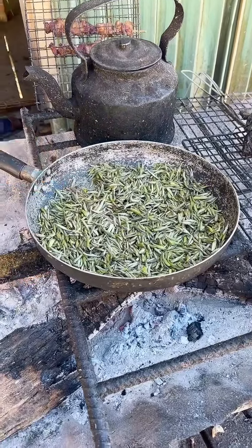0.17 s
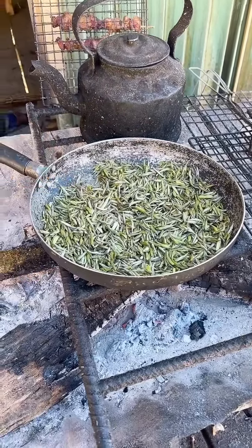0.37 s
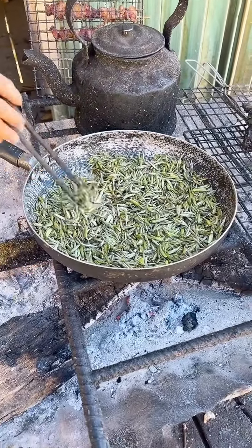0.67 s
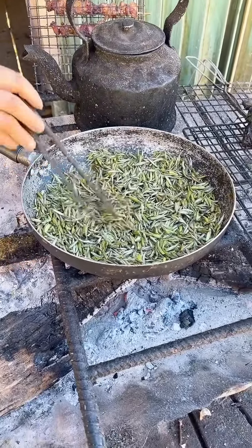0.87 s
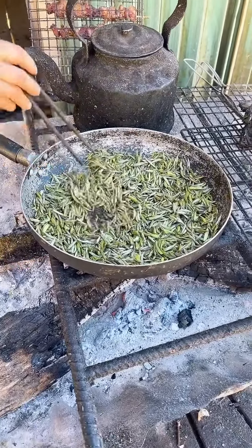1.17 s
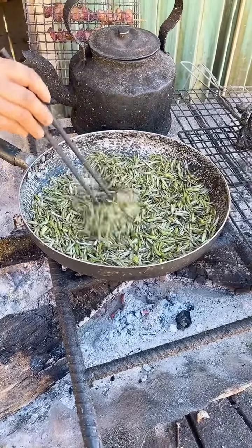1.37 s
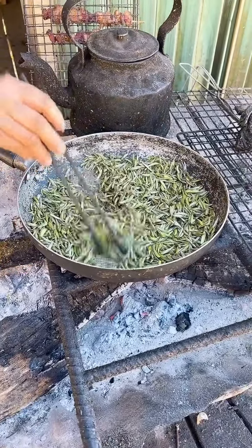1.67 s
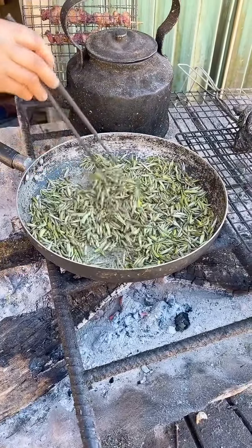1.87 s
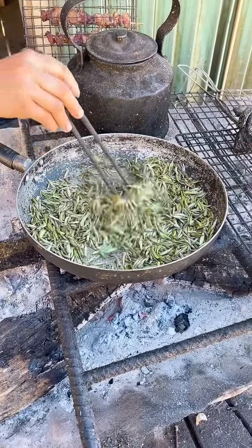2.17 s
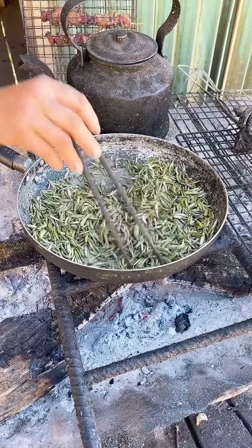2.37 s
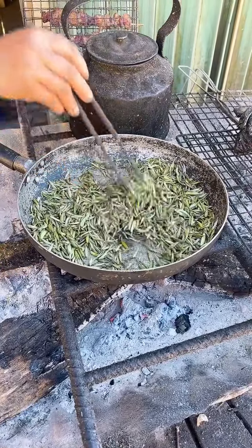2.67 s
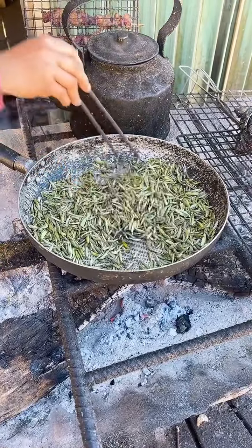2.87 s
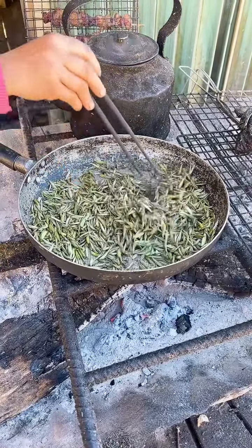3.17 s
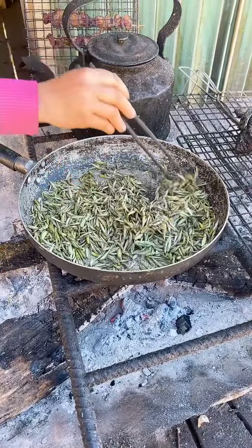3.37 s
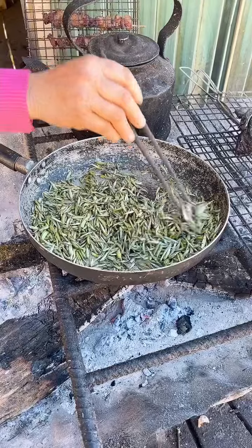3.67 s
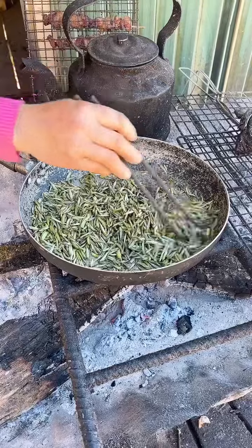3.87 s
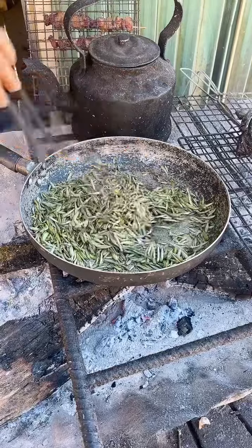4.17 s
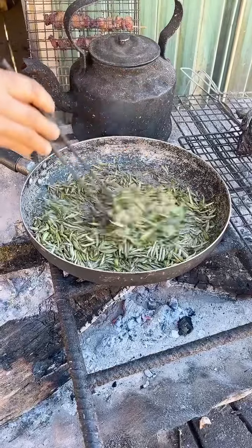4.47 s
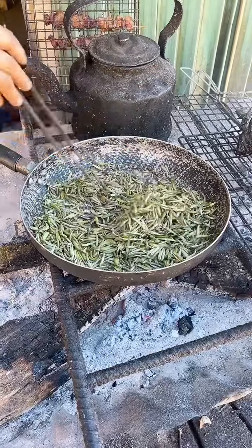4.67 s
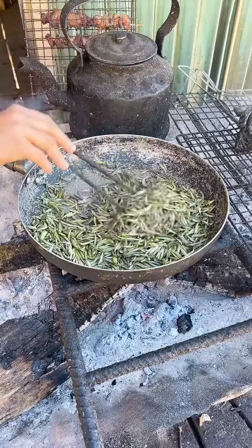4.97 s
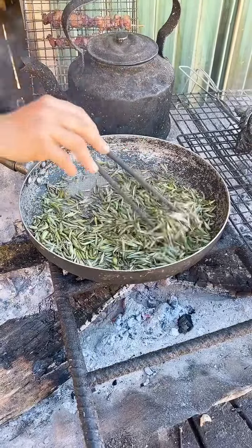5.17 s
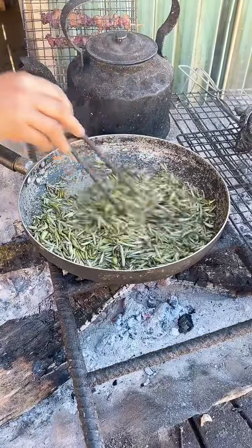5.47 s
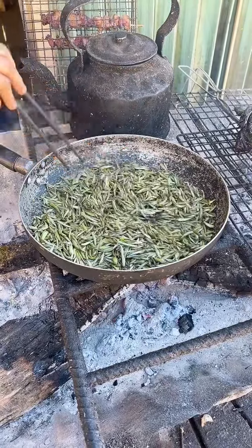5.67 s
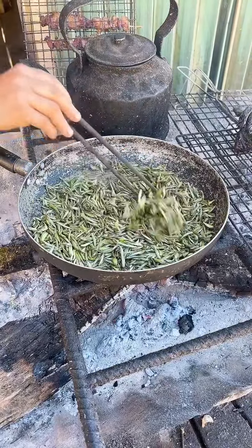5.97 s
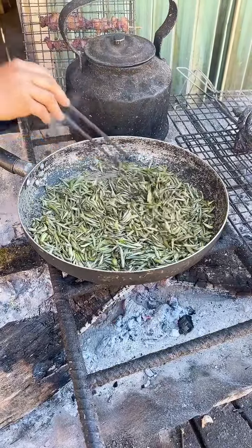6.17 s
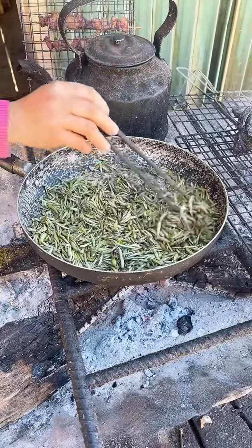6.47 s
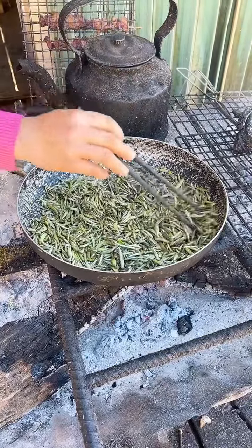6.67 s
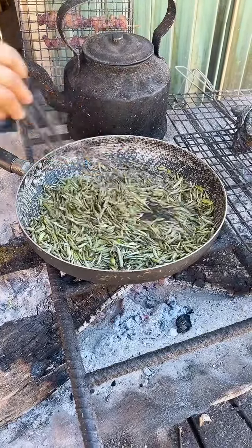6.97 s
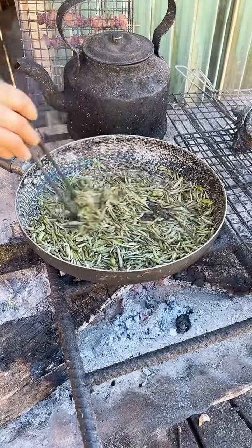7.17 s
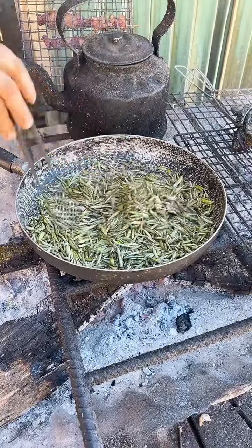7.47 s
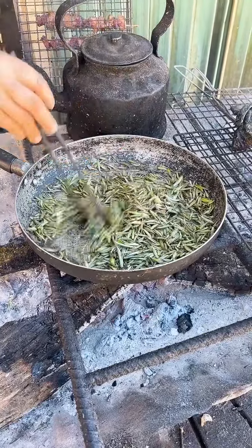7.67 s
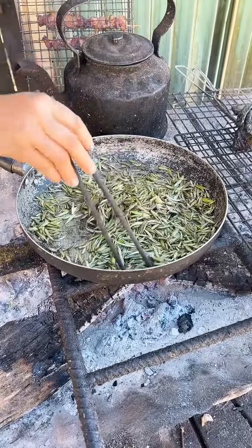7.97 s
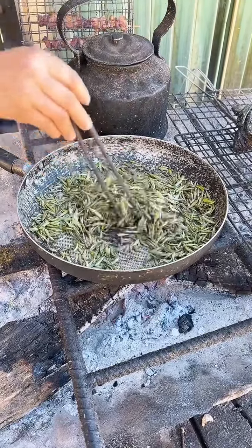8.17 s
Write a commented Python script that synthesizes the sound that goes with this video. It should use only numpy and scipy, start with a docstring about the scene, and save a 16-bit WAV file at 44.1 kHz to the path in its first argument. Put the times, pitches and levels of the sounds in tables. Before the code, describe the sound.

Long metal sticks stir dry tea leaves in a steel pan, close to a phone outdoors. After a nearly quiet start with small leaf ticks, soft rustling strokes begin and soon come about twice a second. Tips strike the pan with short, damped clinks and rasp briefly over the steel; the hardest knocks and scrapes come around five to six seconds. Low airy rumble and faint hiss continue underneath.

```python
"""You hear metal knocks and gritty scrapes, rustling and ticking leaves, and a low rumble with faint hiss.
Long metal sticks stir dry tea leaves in a steel pan over embers, outdoors, close to a phone.
Scrapes and knocks are noise sent through the resonances of the pan, which the leaves damp.
Rustle is shaped noise that swells with each sweep, ticks are very short noise bursts,
and the outdoor air is steady noise with a slowly swelling bass."""
import sys
import numpy as np
from scipy import signal
from scipy.fft import rfft, irfft, next_fast_len
from scipy.io import wavfile

SR = 44100
rng = np.random.default_rng(int(sys.argv[2]) if len(sys.argv) > 2 else 0)


def wav_record(signal):
    """Record a signal, one row per channel, as 16-bit PCM in the file named by sys.argv[1]."""
    frames = np.transpose(np.atleast_2d(signal))
    bounded = np.clip(frames, -1, 1)
    # unit amplitude maps onto the largest positive 16-bit level
    quanta = np.round(bounded * 32767).astype(np.int16)
    wavfile.write(sys.argv[1], SR, quanta)


N = 367308  # length [samples]

# the pan's modes (its own tones), damped by the leaves; some sources rescale widths or strengths:
# (frequency [Hz], width [Hz], strength [dB])
PAN_MODES = [(185, 34, -2), (338, 23, -10), (372, 63, -1.5), (436, 16, -2.5), (625, 15.6, 3.5),
             (673, 39, -2), (743, 20.3, 5.5), (790.3, 32.5, 1.5), (831, 30, -4), (874, 31, -16),
             (1297, 29, -9.5), (1422, 51, -8), (1513, 39, -4), (1635, 23, -14), (1740, 15, -24),
             (2401, 18, 1), (2829, 43, 8.5), (3120, 34, -2), (3330, 52, 1.5), (3647, 25, 9.5),
             (3710, 29, -4), (4010, 71, -2), (4454, 44, -10), (4780, 46, -11), (5140, 58, -10.5),
             (5580, 27, 1), (5990, 70, -9), (6300, 59, -6), (6930, 70, -5), (7100, 56, -28),
             (7690, 86, -5.5), (8507, 92, -2.5), (9180, 210, -15), (9740, 110, -26)]


def scrape(drag_db, tip_db, rock_db, tone_hz):
    """Tips stick and slip in tiny clicks that ring the pan; their place decides which modes they reach."""
    # how the rasp between the modes is coloured: (frequency [Hz], level per Hz [dB])
    rasp_tone = [(300, -27.5), (800, 15), (1150, 14), (1600, 21), (3000, 20.5), (5000, 12), (9800, -49),
                 (10800, -40), (16000, -17)]
    reach_octaves, far_db = 0.18, -12  # how near a mode must be to ring well; how weak a far one gets
    patchy_db, judder_db = 3.5, 3.0  # random unevenness of each mode, and of the clicks in time
    deep = [m for m in PAN_MODES if 0 < m[0] <= 500]
    low = [m for m in PAN_MODES if 500 < m[0] <= 2000]
    high = [m for m in PAN_MODES if 2000 < m[0] <= SR]
    slip = grit(4000, 1.06) * undb(judder_db * walk(70))

    # each spot favours one low tone; modes from 1100 Hz up to 2000 Hz always answer
    near = []
    for hz, _, _ in low:
        distance = np.log2(hz / tone_hz) / reach_octaves
        near.append(undb(far_db * np.minimum(distance ** 2, 1) * (hz < 1100)))
    # make up for the weakened modes, so that every spot drags equally loud
    reached = sum(g ** 2 * undb(db) ** 2 * width for g, (_, width, db) in zip(near, low))
    share = reached / sum(undb(db) ** 2 * width for _, width, db in low)
    drag_gains = [g * undb(patchy_db * walk(20)) for g in near]
    drag = ring(slip * undb(drag_db) / np.sqrt(share), low, drag_gains)

    rock = ring(slip * undb(rock_db), deep, [undb(patchy_db * walk(15)) for _ in deep])
    scratch = grit(5000, 1.6) * undb(judder_db * walk(70) + tip_db)
    tips = ring(scratch, high, [undb(patchy_db * walk(20)) for _ in high])
    # countless small modes merge into a broad rasp
    rasp = unit(colour(grit(6000, 0.5), rasp_tone)) * undb(tip_db + judder_db * walk(60))
    return undb(-4.5) * drag + undb(-1.5) * rock + undb(-5.5) * tips + undb(-5.5) * rasp


def pressing(rustle_db):
    """Pressing harder onto the steel scrapes louder; sweeping tips also brush it lightly."""
    # tips pressed onto the steel, levels before the mix in scrape:
    # (start [s], hardest [s], end [s], drag level [dB], tip scratch above drag [dB],
    #  rocking on the grate above drag [dB], low tone that this place favours [Hz])
    digs = np.array([(0.994, 1.002, 1.022, -44, 1, -22, 830), (1.279, 1.286, 1.312, -31.5, 1, -12, 830),
                     (2.074, 2.097, 2.135, -28, -5.5, -14.5, 770),
                     (2.456, 2.478, 2.53, -43.5, -15, -4, 775),
                     (2.535, 2.572, 2.595, -33.5, -3.5, -15, 800), (2.888, 2.91, 2.97, -34, -15, -8, 650),
                     (3.01, 3.02, 3.04, -39, -8, -8, 765), (3.32, 3.345, 3.375, -31, -10, -8, 650),
                     (3.375, 3.395, 3.43, -35, -12, -1, 600), (3.465, 3.497, 3.515, -30, -7.5, -7.5, 770),
                     (3.537, 3.542, 3.58, -41, -10, -10, 770), (4.292, 4.31, 4.325, -41, -2, -8, 800),
                     (4.335, 4.353, 4.365, -29, -6, -9, 855), (4.845, 4.885, 4.96, -18.5, -5, -24, 763),
                     (5.74, 5.75, 5.785, -29, 3, -16, 700), (5.79, 5.841, 5.885, -24, -4, -24, 750),
                     (6.262, 6.305, 6.357, -20, -3, -33, 760), (6.795, 6.826, 6.848, -26, -8.5, -21.5, 750),
                     (7.59, 7.6, 7.625, -46, -8, -10, 760), (7.66, 7.678, 7.695, -39, -3.5, -9, 765),
                     (7.993, 8.03, 8.07, -42.5, -2.5, -4.5, 810), (8.07, 8.093, 8.112, -29, -2, -13, 870)])
    # shape of one dig: (sag at its ends [dB], bulge exponent, rise [s], stop [s],
    #  after-sound [dB], after-sound [s])
    dig_shape = (-8, 2.2, .002, .008, -17, .04)
    # at a sweep of -45 dB the brush has these levels; each dB of rustle adds 1.48 dB
    brush_at_db, brush_slope = -45, 1.48
    brush_drag_db, brush_tip_db = -47, -44.5

    def pressed(above_db):
        """Power over time of all digs, raised by a number of dB."""
        return swells(np.c_[digs[:, :3], digs[:, 3] + above_db], *dig_shape)

    brush = undb(brush_slope * (rustle_db - brush_at_db)) ** 2
    drag_db = 10 * np.log10(pressed(0) + brush * undb(brush_drag_db) ** 2)
    tip_db = 10 * np.log10(pressed(digs[:, 4]) + brush * undb(brush_tip_db) ** 2)
    rock_db = 10 * np.log10(pressed(digs[:, 5]))
    tone_hz = np.interp(np.arange(N) / SR, digs[:, 1], digs[:, 6])
    return drag_db, tip_db, rock_db, tone_hz


def knocks():
    """Each landing chatters for a few ms: a crack, the pan's modes in a new mix, a short rattle."""
    # tips landing on the bottom: (time [s], level [dB], low thud above that level [dB],
    #  chatter [s], bright tone [Hz], thud tone [Hz])
    landings = [(0.9966, -46.5, 11.5, 0.005, 3400, 960), (1.2797, -29.5, 7.5, 0.003, 2820, 845),
                (2.0385, -14, -9.5, 0.0047, 8000, 750), (2.3748, -30, -25, 0.004, 3680, 358),
                (2.5331, -28, -5, 0.0041, 3660, 716), (2.5646, -25.5, 5, 0.0069, 3660, 790),
                (2.8856, -13, -10.5, 0.0034, 7100, 708), (3.3148, -16.5, -3.5, 0.0083, 3800, 1530),
                (3.4373, -19.5, -4, 0.0023, 2830, 370), (3.4705, -27.5, 3, 0.013, 2900, 729),
                (3.538, -44, -6, 0.0064, 2840, 751), (4.29, -27, -11, 0.003, 2820, 1500),
                (4.3498, -29, -10, 0.002, 2790, 872), (4.3919, -27, 3, 0.0025, 2830, 789),
                (4.8055, -11, -4.5, 0.0042, 5640, 694), (4.8453, -16.5, 4, 0.0021, 3440, 1510),
                (4.8587, -16.5, -12, 0.0046, 2720, 770), (5.7369, -6.5, -9, 0.007, 2900, 595),
                (6.1869, -11, -11.5, 0.0043, 6960, 730), (6.2662, -19.5, -5, 0.0057, 3680, 750),
                (6.2934, -19, -6, 0.0045, 6230, 800), (6.798, -30, -2, 0.0066, 2820, 751),
                (7.9932, -40, 10.5, 0.0026, 3680, 390), (8.0434, -34, -6, 0.005, 2780, 773),
                (8.09, -20, -5, 0.005, 3360, 1530)]
    scatter_db, near_db, spot_db = 3.0, -5, 9  # random mix; change per octave away; boost under the tip
    crack_db, ring_db, tail_db, tail_s = -0.5, -0.5, -20, 0.032
    out = np.zeros(N + SR)
    t = np.arange(int(.3 * SR)) / SR
    low = [m for m in PAN_MODES if m[0] <= 2000]
    # above 2000 Hz the modes differ less in strength
    high = [(hz, width, 0.37 * db) for hz, width, db in PAN_MODES if hz > 2000]
    mode_hz = np.array(PAN_MODES)[:, 0]
    rise = np.minimum(t / 0.00068, 1)
    for s, db, thud_db, chatter_s, bright_hz, thud_hz in landings:
        # modes weaken with their distance in octaves from the tones that this spot favours
        favoured = np.where(mode_hz <= 2000, thud_hz, bright_hz)
        octaves_off = abs(np.log2(mode_hz / favoured))
        # the mode right under the tip rings out clearly
        under_tip = spot_db * np.exp(-(octaves_off / 0.055) ** 2)
        mix = undb(scatter_db * rng.standard_normal(len(PAN_MODES)) + near_db * octaves_off + under_tip)
        noise = rng.standard_normal((2, len(t)))
        push = noise[0] * rise * np.exp(-(t / chatter_s) ** 1.07)
        thud = ring(push, low, mix)
        clink = ring(push, high, mix[len(low):])
        crack = band(band(push, bright_hz, 5.7), bright_hz, 5.7)
        rattle = band(noise[1], bright_hz, 1.0) * rise * np.exp(-t / tail_s)
        bright = undb(crack_db) * crack / abs(crack).max()
        bright += undb(ring_db) * clink / abs(clink).max()
        bright += undb(tail_db) * rattle
        i = int(s * SR)
        out[i:i + len(t)] += undb(db) * (bright + undb(thud_db) * thud / abs(thud).max())
    # a landing puts little above the pan's highest strong modes
    return signal.sosfilt(signal.cheby2(2, 14, 11500, fs=SR, output="sos"), out[:N])


def sweeps():
    """Rustle level over time [dB]: each sweep through the leaves swells, stops and dies away."""
    # each sweep: (start [s], fullest [s], end [s], level [dB])
    sweep_rows = [(0.695, 0.744, 0.83, -53.5), (0.963, 1.02, 1.125, -50.5), (1.262, 1.31, 1.477, -47.5),
                  (1.668, 1.744, 1.86, -46), (2.048, 2.15, 2.275, -45.5), (2.36, 2.397, 2.4, -54),
                  (2.535, 2.61, 2.73, -46), (2.896, 3.057, 3.157, -45.5), (3.33, 3.457, 3.62, -46.5),
                  (3.773, 3.795, 3.83, -56.5), (3.892, 3.986, 4.15, -43.5), (4.287, 4.365, 4.48, -52),
                  (4.42, 4.504, 4.574, -42.5), (4.69, 4.75, 4.8, -58), (4.808, 4.875, 5.05, -43),
                  (5.357, 5.484, 5.62, -43.5), (5.742, 5.84, 6.01, -46.5), (6.263, 6.31, 6.4, -42.5),
                  (6.735, 6.86, 6.955, -45), (7.13, 7.28, 7.385, -48), (7.443, 7.483, 7.55, -52.5),
                  (7.635, 7.69, 7.765, -44), (8, 8.095, 8.25, -44.5)]
    # shape of one sweep: (sag at its ends [dB], bulge exponent, rise [s], stop [s],
    #  after-sound [dB], after-sound [s])
    sweep_shape = (-9.5, 1.67, 0.02, .013, -22, .16)
    return 10 * np.log10(swells(sweep_rows, *sweep_shape))


def leaves(rustle_db):
    """Dry leaves rub on each other and on the steel in noise and clicks; single ones snap or drop."""
    # colour of the rustle: (frequency [Hz], level per Hz [dB])
    leaf_tone = [(880, 7), (1500, -34), (2590, -41.5), (2740, -14), (3690, -13.5), (5660, 2), (8570, 8.5),
                 (10900, -2.5), (14600, 4), (16000, -7)]
    # single leaves snapping or dropping: (time [s], peak level [dB], centre [Hz])
    ticks = [(0.204, -37.5, 6340), (0.2114, -32, 11000), (0.975, -34, 8300), (1.19, -39, 2900),
             (1.5549, -38.5, 8280), (1.5896, -37.5, 4600), (1.6574, -29.5, 6050), (1.905, -32.5, 9200),
             (2.4553, -42, 6300), (2.806, -36.5, 7500), (3.2226, -40, 6280), (3.269, -39.5, 7160),
             (3.2844, -41, 6820), (3.7823, -39, 6850), (3.7994, -42, 6820), (4.1604, -41, 7350),
             (5.0883, -41, 8580), (5.1866, -40, 7650), (5.2046, -30.5, 8300), (5.676, -41, 4530),
             (6.7446, -41, 8090), (7.0863, -41, 8530), (7.1117, -44, 8993), (7.1561, -32, 7500),
             (7.451, -40, 8900), (7.5038, -37, 4870), (7.8221, -32.5, 8700), (7.867, -41.5, 4050),
             (7.9086, -30, 8200), (8.1853, -33, 8380), (8.2402, -34.5, 9170)]
    hush = rng.standard_normal(N) * undb(0.5 * walk(30))
    crackle = signal.lfilter([1], [1, -.6], grit(900, 1.7))
    rustle = unit(colour(hush + undb(0.5) * unit(crackle), leaf_tone))
    out = rustle * undb(rustle_db + 0.2)

    # sliding leaves also tickle the upper modes, all about equally
    upper = [(hz, 0.64 * width, 0.1 * db) for hz, width, db in PAN_MODES if hz > 2000]
    tickle = grit(3000, 1.8) * undb(rustle_db - 3.5)
    out += ring(tickle, upper, [undb(4 * walk(18)) for _ in upper])

    t = np.arange(int(.03 * SR)) / SR
    fade = np.exp(-t / 0.0021) + 0.22 * np.exp(-t / 0.0093)
    for s, db, hz in list(ticks) + strays():
        snap = band(band(rng.standard_normal(len(t)) * fade, hz, 1.4), hz, 1.4)
        i = int(s * SR)
        out[i:i + len(t)] += undb(db) * snap / abs(snap).max()
    return out


def strays(most=60):
    """Faint leaves that snap at random moments: rows of (time [s], peak level [dB], centre [Hz])."""
    per_s, faintest_db, spread_db = 2.7, -49.5, 3.0
    u = rng.random((most, 3))
    s = np.cumsum(-np.log(1 - u[:, 0])) / per_s
    db = faintest_db - spread_db * np.log(1 - u[:, 1])
    hz = 4500 * 2 ** u[:, 2]
    return [tuple(row) for row in np.transpose([s, db, hz]) if row[0] < N / SR - .05]


def air():
    """Distant rumble and hiss, made from coloured noise; the bass swells a little."""
    # colour of the outdoor air: (frequency [Hz], level per Hz [dB])
    air_tone = [(12, -51), (20, -18), (60, 0), (108, 0.5), (360, -12), (748, -17.5), (1050, -19),
                (3040, -27), (11400, -40.5), (15100, -48), (16400, -62)]
    low_pass = signal.butter(2, 500, fs=SR, output="sos")
    rumble = signal.sosfilt(low_pass, rng.standard_normal(N))
    steady = rng.standard_normal(N)
    swelling = .5 * rumble * undb(1.0 * walk(3.5))
    return unit(colour(steady + swelling, air_tone)) * undb(-45.5)


def swells(rows, sag_db, bulge, rise_s, stop_s, after_db, after_s):
    """Power over time of (start, top, end, dB) gestures: swell to a broad top, stop short, die away."""
    t = np.arange(0, N + 64, 64) / SR
    power = 1e-9  # a tiny floor keeps the logarithm finite
    for start, fullest, end, db in rows:
        before_top = (fullest - t) / max(fullest - start, .005)
        past_top = (t - fullest) / max(end - fullest, .005)
        place = np.where(t < fullest, before_top, past_top)  # 0 at the top, 1 at either end
        outside = np.maximum(start - t, 0) / rise_s + np.maximum(t - end, 0) / stop_s
        top = undb(sag_db * np.minimum(place, 1) ** bulge) * np.exp(-outside)
        after = undb(after_db) * np.exp(-np.maximum(t - end, 0) / after_s) * (t > fullest)
        power = power + undb(db) ** 2 * (top ** 2 + after ** 2)
    return np.interp(np.arange(N) / SR, t, power)


def ring(push, modes, gains):
    """Drive each mode with its own share of the push; at gains near 1, steady noise of rms 1 keeps its rms."""
    total = sum(mode(push * undb(db) * g, hz, width) for (hz, width, db), g in zip(modes, gains))
    return total / np.sqrt(sum(undb(db) ** 2 * width for _, width, db in modes) * np.pi / SR)


def mode(x, hz, width_hz):
    """One resonance: a narrower one rings longer; the level at its centre is kept."""
    r = np.exp(-np.pi * width_hz / SR)
    return signal.lfilter([1 - r, 0, r - 1], [1, -2 * r * np.cos(2 * np.pi * hz / SR), r * r], x)


def grit(per_s, spread_db):
    """Random clicks of unequal size, like rough spots catching, rms 1."""
    hit = rng.random(N) < per_s / SR
    size = np.minimum(rng.exponential(size=N), 4)
    return unit(hit * rng.standard_normal(N) * undb(spread_db * size))


def walk(rate):
    """Random levels 1 / rate s apart, joined by straight lines; spread near 1."""
    knots = rng.standard_normal(int(N / SR * 100) + 2)
    return 1.2 * np.interp(np.arange(N) * rate / SR, np.arange(len(knots)), knots)


def colour(x, points):
    """Shape the spectrum by (Hz, dB) points, joined on a log-frequency axis."""
    size = next_fast_len(len(x))
    hz, db = np.transpose(points)
    f = np.maximum(np.arange(size // 2 + 1) * SR / size, 1)
    gain = undb(np.interp(np.log(f), np.log(hz), db))
    return irfft(rfft(x, size) * gain, size)[:len(x)]


def band(x, hz, octaves):
    """Gentle band-pass, so many octaves wide."""
    half = 2 ** (octaves / 2)
    edges = np.clip([hz / half, hz * half], 50, .45 * SR)
    return signal.sosfilt(signal.butter(1, edges, "bandpass", fs=SR, output="sos"), x)


def undb(db):
    """Decibels to gain."""
    return np.exp(np.asarray(db) * np.log(10) / 20)


def unit(x):
    """Scale to rms 1."""
    return x / np.sqrt(np.mean(x ** 2))


def scene():
    """All sources added up in one channel."""
    rustle_db = sweeps()
    pan = scrape(*pressing(rustle_db)) + knocks()
    return (pan + leaves(rustle_db) + air())[None]


def record(dry):
    """The phone cuts the treble steeply above 15850 Hz."""
    return signal.sosfilt(signal.ellip(8, .2, 70, 15850, fs=SR, output="sos"), dry)


dry = scene()
out = record(dry)
wav_record(out)
```